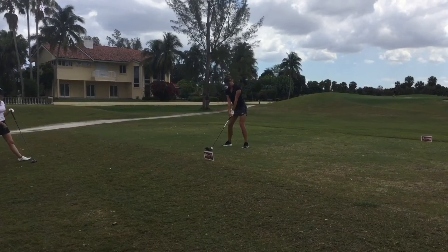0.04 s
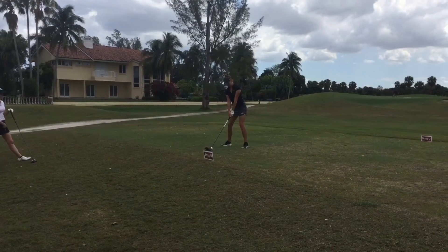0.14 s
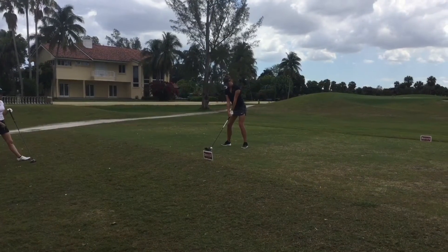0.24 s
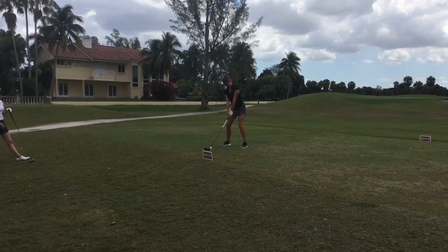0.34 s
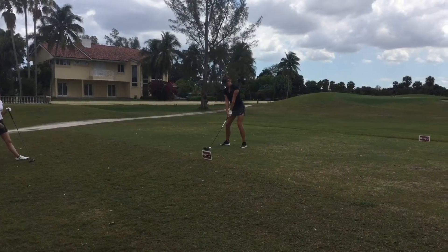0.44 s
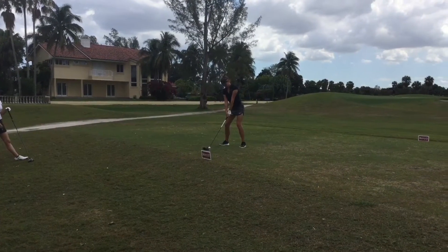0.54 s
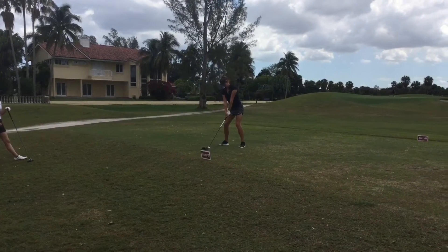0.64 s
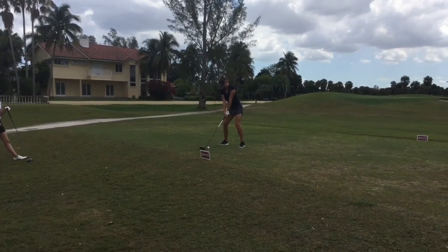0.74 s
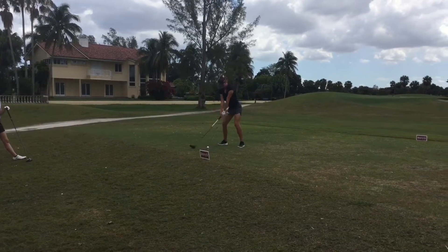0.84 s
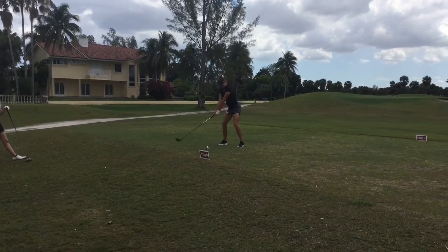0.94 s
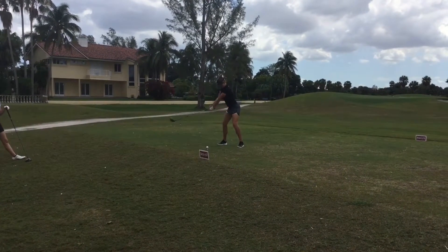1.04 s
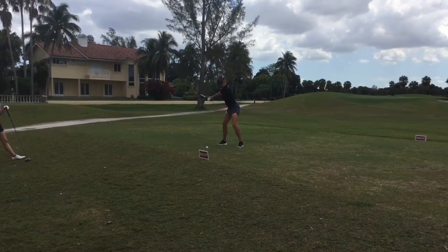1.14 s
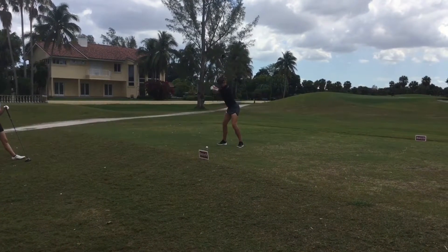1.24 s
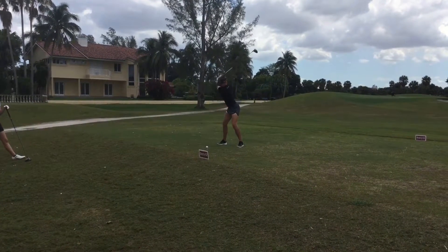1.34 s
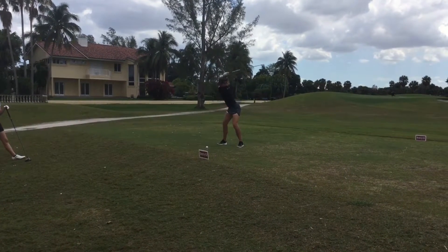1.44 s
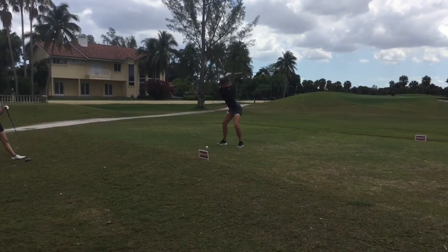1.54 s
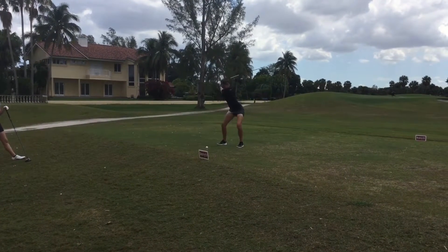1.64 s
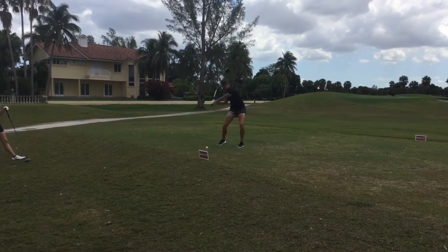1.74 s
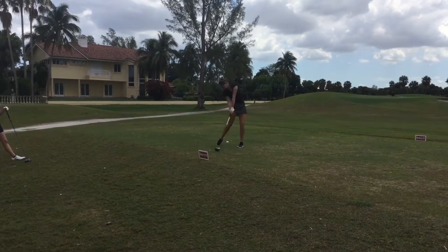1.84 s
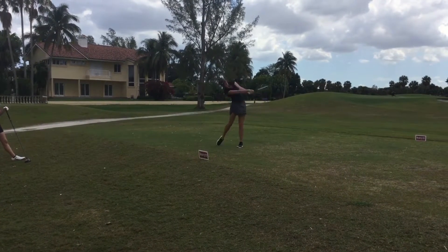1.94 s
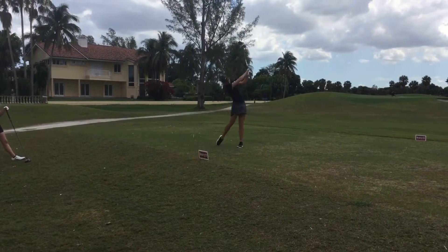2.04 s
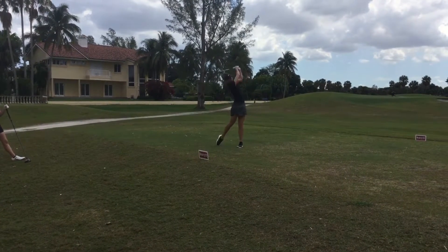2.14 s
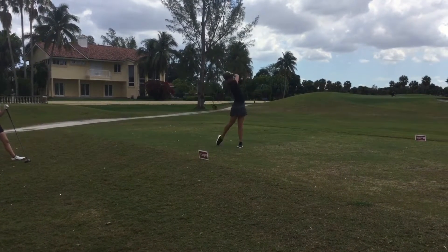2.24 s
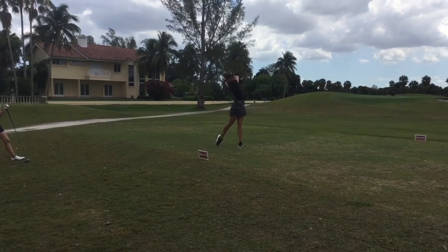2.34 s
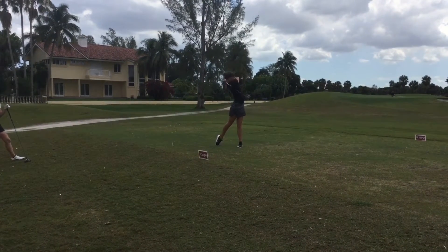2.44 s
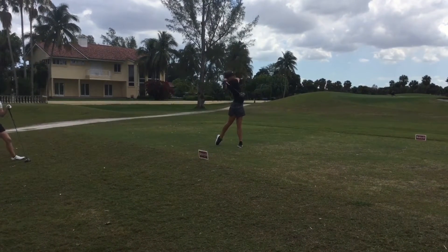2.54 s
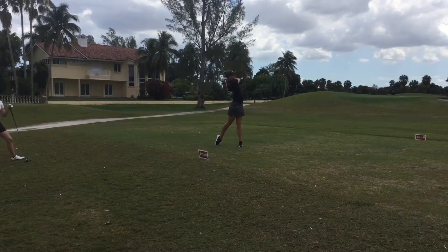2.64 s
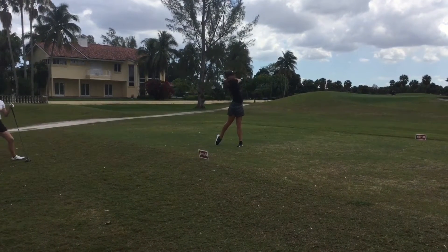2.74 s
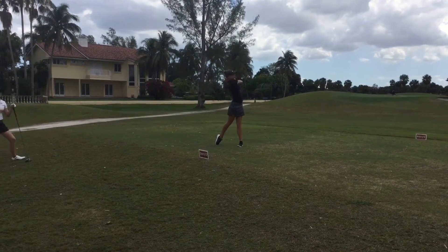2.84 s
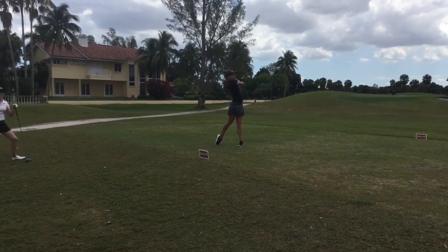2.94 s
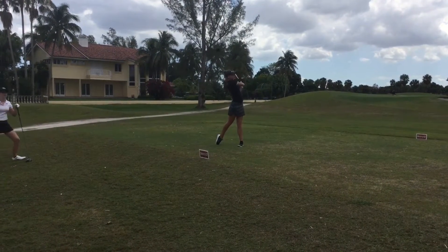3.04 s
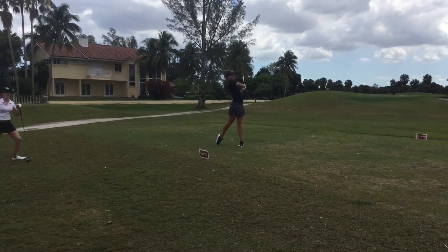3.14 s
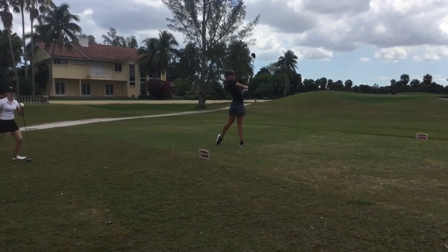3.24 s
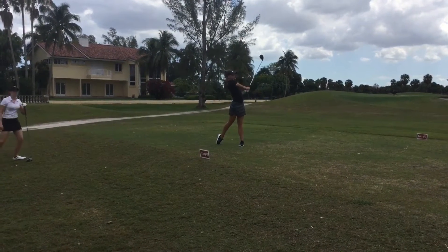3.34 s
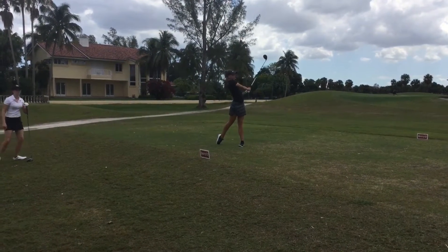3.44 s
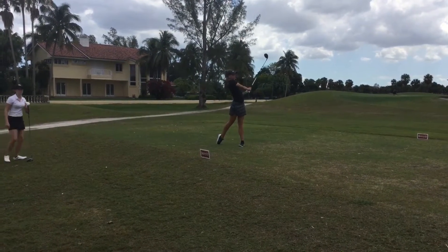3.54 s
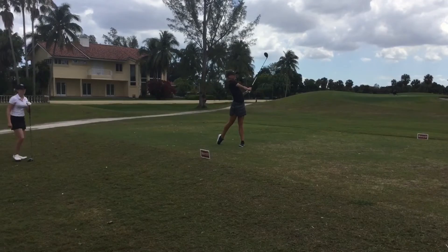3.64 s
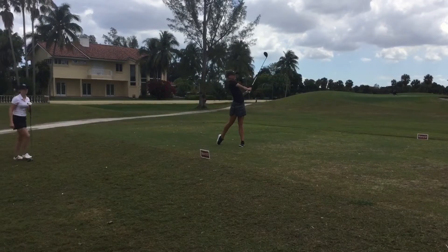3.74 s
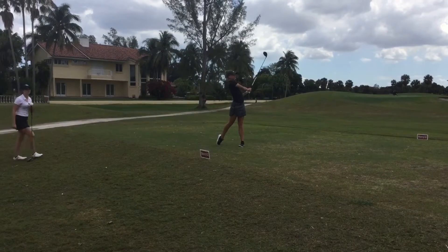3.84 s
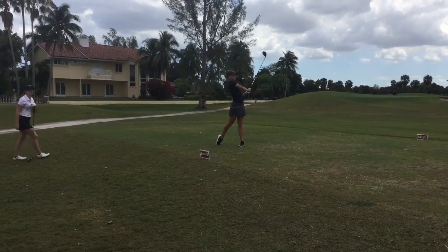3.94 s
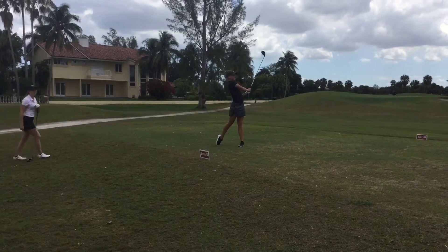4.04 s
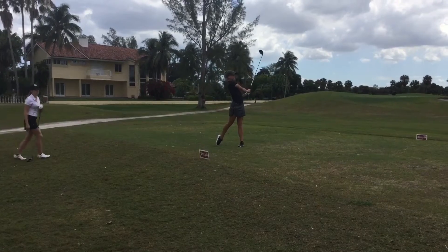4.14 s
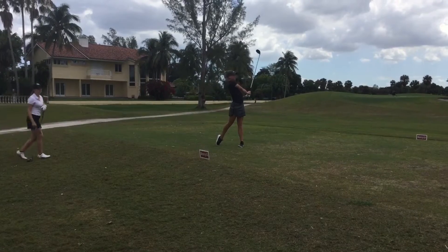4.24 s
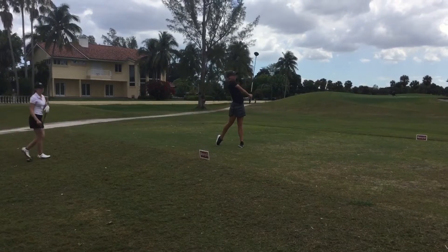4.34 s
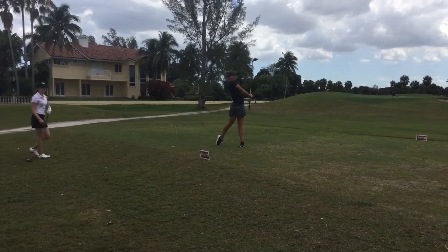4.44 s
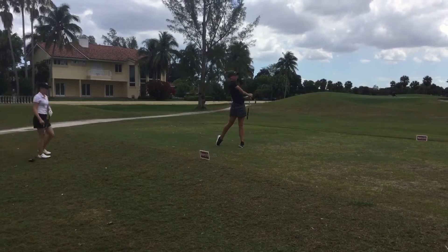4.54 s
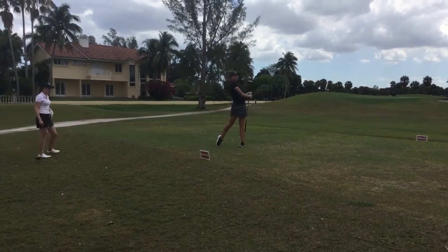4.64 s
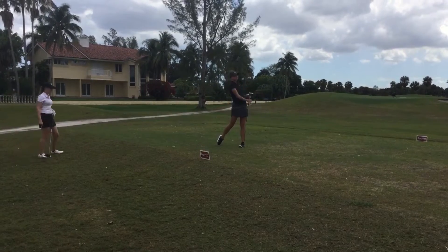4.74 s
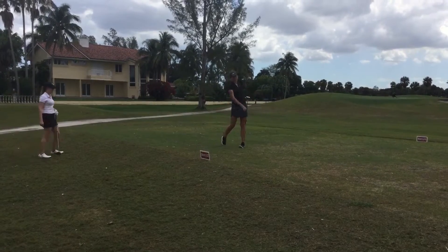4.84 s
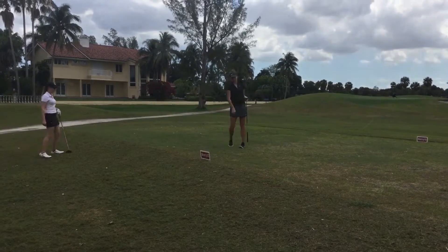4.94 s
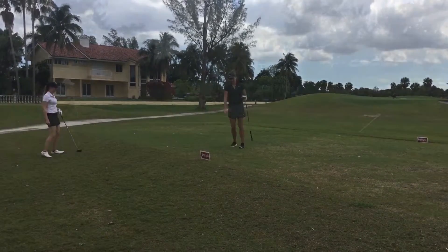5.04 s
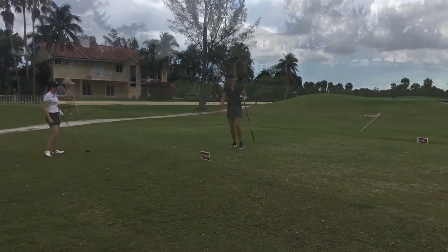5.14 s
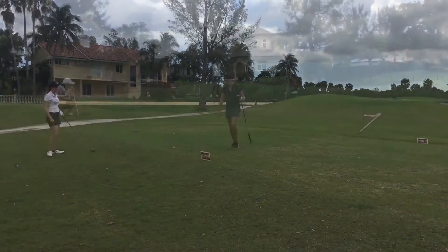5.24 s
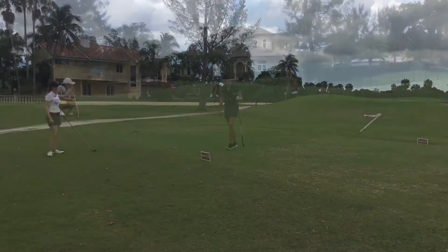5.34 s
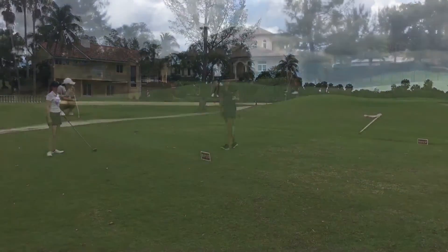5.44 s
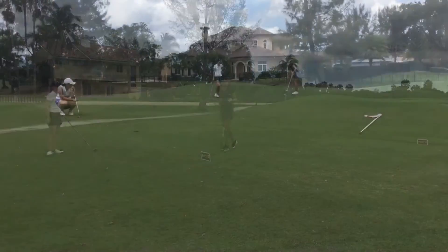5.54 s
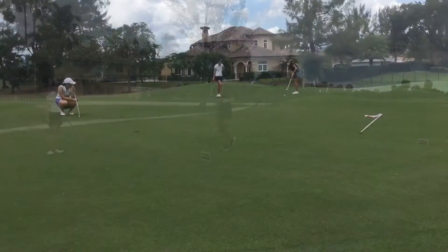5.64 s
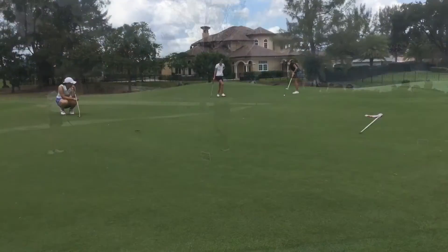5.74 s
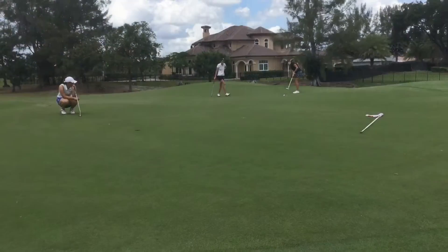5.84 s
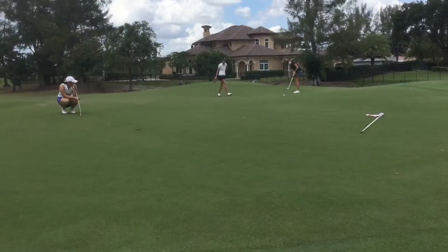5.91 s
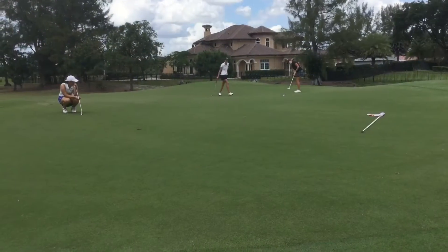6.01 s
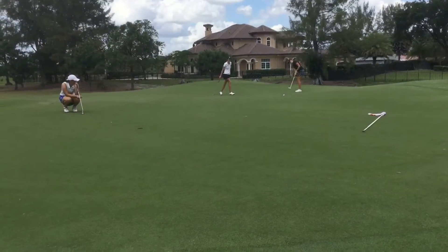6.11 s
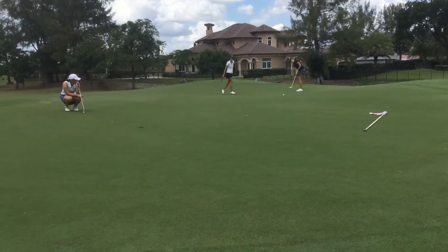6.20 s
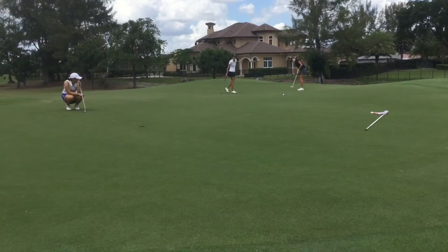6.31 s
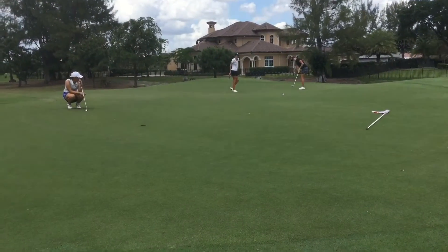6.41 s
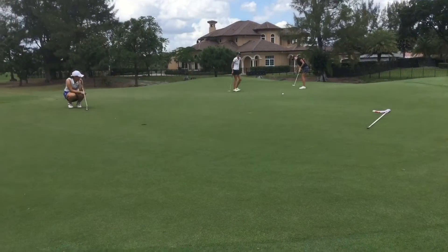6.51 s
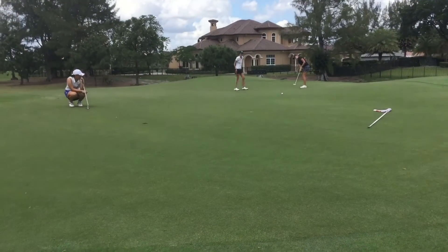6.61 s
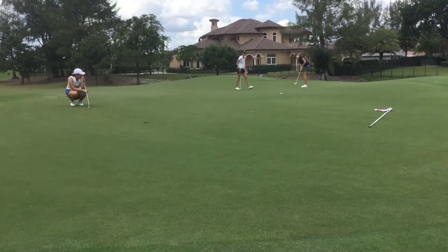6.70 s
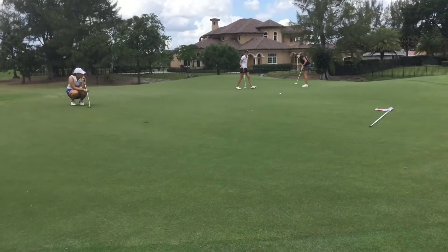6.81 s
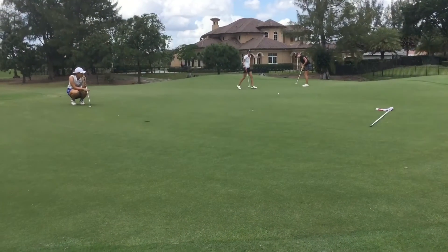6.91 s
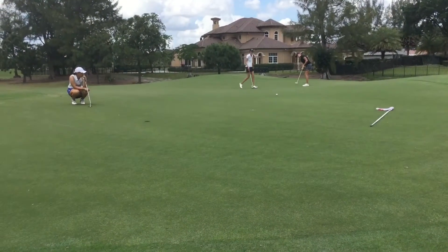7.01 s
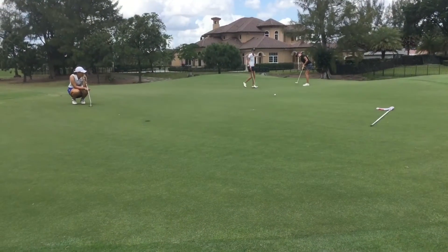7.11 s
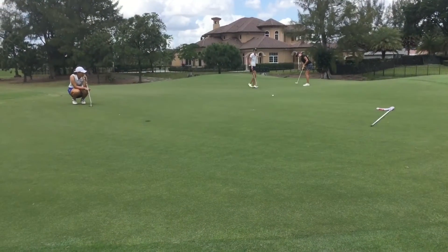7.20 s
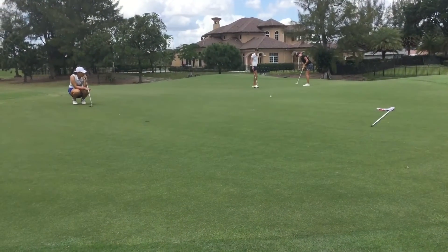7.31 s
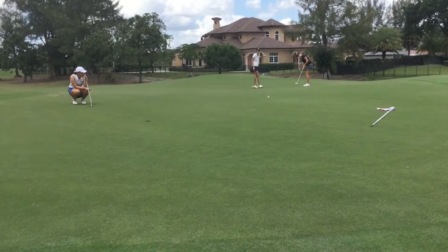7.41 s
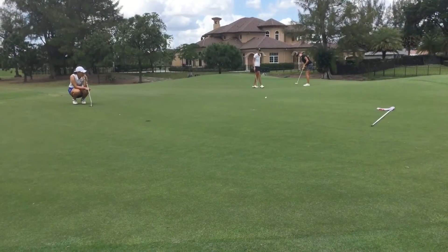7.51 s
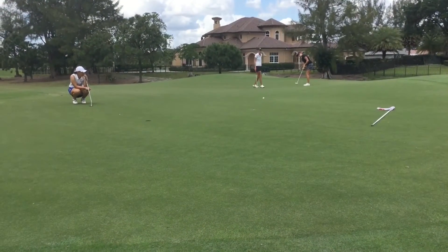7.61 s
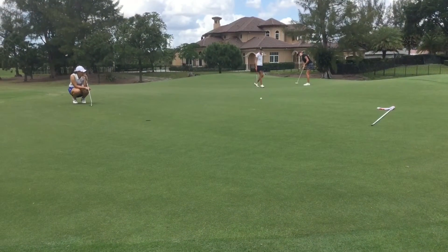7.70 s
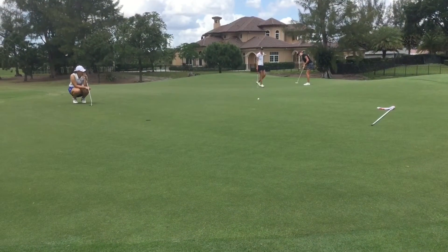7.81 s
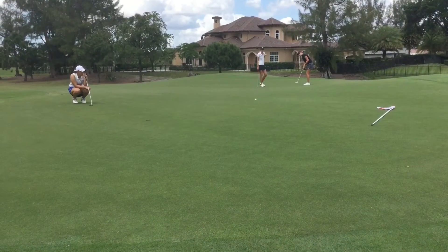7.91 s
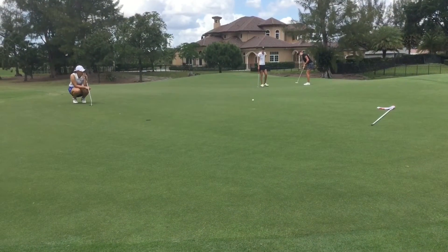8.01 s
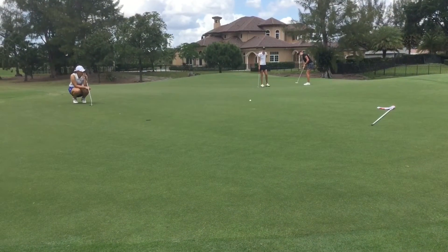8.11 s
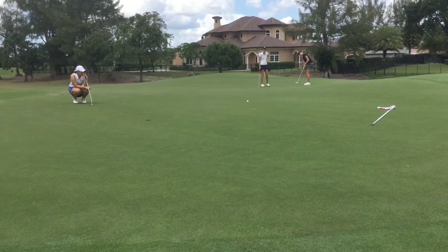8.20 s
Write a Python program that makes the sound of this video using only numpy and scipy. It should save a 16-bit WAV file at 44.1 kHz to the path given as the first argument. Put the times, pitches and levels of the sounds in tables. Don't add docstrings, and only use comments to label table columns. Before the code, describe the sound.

One very sharp golf drive stands far above a quiet open-air background of bass wind rumble and distant traffic wash. A fast whoosh leads into the snap, with a hollow ringing clubhead and a half-second of scattered reflections. Soft knocks, cloth rustles, a gritty glove slide and barely audible birds follow. Midway the ambience crossfades smoothly to a fuller one; no loud putt is heard.

```python
import sys
import numpy as np
from scipy import signal
from scipy.fft import rfft, irfft
from scipy.io import wavfile

SR = 44100
rng = np.random.default_rng(int(sys.argv[2]) if len(sys.argv) > 2 else 0)


def gain_from_decibels(decibels):
    exponent = np.asarray(decibels, float) / 20
    return 10 ** exponent


def materialize(psi):
    bounded = np.clip(np.atleast_2d(psi).T, -1, 1)
    quanta = np.round(bounded * 32767).astype(np.int16)
    wavfile.write(sys.argv[1], SR, quanta)


N = 364266

# t/s, rumble level/dB
GUSTS = [(0.0, -48.5), (0.09, -43.5), (1.93, -41.5), (1.98, -50), (2.09, -44.5), (2.78, -45), (3.63, -41),
         (3.86, -48.5), (3.91, -40.5), (5.36, -46.5), (6.56, -39.5), (6.6, -52), (6.67, -39), (6.81, -43),
         (7.45, -43), (7.55, -45.5), (8.24, -40), (8.26, -48.5)]
# t/s, share of the green/0-1
GREEN_SHARE = [
    (0, 0),
    (5.15, 0.04),
    (5.8, 0.73),
    (8.26, 0.98),
]
# f/Hz, density/dB per Hz
TEE_RUMBLE = [(13, -66), (22, -36), (27, -27), (45, -8), (60, -1), (76, 1), (115, -1), (156, -6.5),
              (179, -16), (232, -21), (330, -35.5), (430, -63), (730, -120)]
# f/Hz, density/dB per Hz
GREEN_RUMBLE = [(13, -65), (22, -35), (27, -31.5), (29, -21), (34, -14), (44, -8.5), (70, 2), (107, -5.5),
                (143, -5), (257, -22), (330, -23.5), (430, -51.5), (730, -120)]
# f/Hz, density/dB per Hz
TEE_AIR = [(120, -25.5), (200, -3), (334, -14.5), (387, -24.5), (529, -19), (659, -22.5), (1100, -24),
           (2050, -34.5), (2250, -34), (2470, -37.5), (7680, -49.5), (14300, -50), (16000, -60)]
# f/Hz, density/dB per Hz
GREEN_AIR = [(120, -31.5), (200, 1), (259, -10), (373, -10), (401, -11), (432, -8.5), (465, -15.5),
             (763, -17.5), (1770, -30.5), (2910, -36.5), (4120, -42), (13800, -57), (16000, -71)]
# t/s, peak level/dB
HUM_SWELLS = [(.02, -71), (.32, -66.5), (.96, -69.5), (1.26, -76), (1.5, -81), (1.69, -82), (2.216, -69),
              (2.39, -76.5), (2.68, -82), (2.96, -77.5), (3.14, -80), (3.28, -79.5), (3.4, -79)]
# t/s, peak level/dB, body f/Hz, brightness/dB, t60/s
KNOCKS = [(0.799, -60, 1160, -10.5, 0.03), (1.269, -58, 1210, -24, 0.03), (2.855, -60, 1060, -22.5, 0.03),
          (2.926, -55, 1297, -22.5, 0.03), (2.97, -56.5, 1130, -23, 0.03), (3.209, -45, 1330, -33, 0.019),
          (4.048, -51.5, 1200, -20, 0.017), (4.797, -51, 1030, -10, 0.051), (5.405, -47, 1040, -30, 0.0086),
          (6.948, -52.5, 1480, -26, 0.035), (7.412, -52.5, 1620, -29.5, 0.028)]
# t/s, length/s, f/Hz, level/dB
RUSTLES = [(.72, .05, 4500, -80), (.72, .05, 2300, -78), (2.9, .08, 1800, -74), (3.207, .008, 4750, -77),
           (3.215, .06, 1500, -71), (3.51, .05, 13000, -82), (4.35, .055, 2800, -69),
           (4.796, .014, 2400, -67), (4.8, .018, 5900, -67), (4.795, .016, 13500, -70),
           (5.29, .025, 12000, -82), (5.332, .01, 4700, -78), (5.332, .008, 3400, -79),
           (5.403, .006, 2700, -70), (5.404, .005, 4600, -75), (5.403, .008, 700, -62)]
# t/s, length/s, start f/Hz, end f/Hz, level/dB
WHISTLES = [(1.165, 0.15, 3450, 3140, -88), (1.31, .09, 3250, 3130, -84.5), (1.393, 0.017, 2700, 2500, -81),
            (1.48, 0.018, 2940, 2750, -66.5), (1.488, 0.015, 8450, 7500, -82),
            (1.491, 0.041, 2420, 1990, -70.5), (1.493, 0.023, 5100, 4230, -73),
            (1.506, 0.026, 4190, 4120, -75), (1.489, .022, 2576, 2290, -65),
            (5.502, 0.029, 2430, 2530, -86.5), (5.591, 0.017, 3750, 3400, -85.5),
            (5.765, .03, 3870, 3520, -82), (5.819, 0.03, 4000, 3660, -81.5), (5.86, .03, 3970, 4050, -85),
            (5.97, 0.046, 4150, 3700, -78.5), (7.164, 0.028, 3060, 3120, -80),
            (7.226, 0.029, 3054, 2790, -74), (7.93, .015, 5100, 5000, -84), (7.969, 0.036, 3050, 2700, -75)]
# low f/Hz, high f/Hz, level at full speed/dB, power of speed, gain reached over the last 15 ms/dB
SWING_BANDS = [
    (450, 1050, -47.5, 1.2, 1.5),
    (280, 2000, -52, 4.0, 12.5),
    (3400, 7600, -52, 4.6, 15.0),
    (8000, 15300, -63, 3.5, -3.0),
]
# lead before the ball/s, level/dB
LEAD_IN = (0.0023, -30.5)
# f/Hz, level from the ball/dB, level from the tee/dB, t60/s
HEAD_MODES = [(3250, -48, -39, .12), (3800, -22, -44, .012), (4220, -29, -37, .07), (4335, -35, -38, .1),
              (5010, -22, -44, .015), (6300, -30, -26, .035), (6525, -31, -30, .055), (6790, -31, -29, .06),
              (7165, -22, -31, .025), (8170, -36, -33, .03), (8890, -34, -38, .07), (10930, -31, -36, .05),
              (12660, -24, -31, .014), (14740, -32, -31, .015)]
# f/Hz, density/dB per Hz
TURF = [(120, -32.5), (200, -1), (2650, -16), (3190, -7), (3560, -18), (4270, -5), (4770, -19), (6400, -10),
        (14900, -17), (16000, -26.5)]
# t/s, dull level/dB, bright over dull/dB, fall/dB per s
WASH = [
    (1.939, -24, -2, 850),
    (1.964, -37, 1, 560),
    (2.004, -55.5, -6.5, 110),
]
# f/Hz, density/dB per Hz
RETURN_COLOUR = [(350, -27), (600, 0.5), (634, -10), (1140, -2.5), (1800, -10.5), (1960, -8.5), (3210, -17),
                 (4220, -7), (4840, -18), (6200, -5), (6830, -12), (13600, -28), (15400, -30.5),
                 (16000, -46)]
# t/s, depth/s, thump level/dB, ring over thump/dB
STANDS = [
    (2.08, 0.11, -57.5, -4),
    (2.205, 0.0079, -63.5, -5),
    (2.257, 0.12, -66, -2.5),
    (2.41, 0.07, -75.5, 1),
    (2.58, .05, -77, -11),
]
STAND_FALLS = 800, 164, 600
# t/s, peak level/dB, ring f/Hz, crack/dB, thump/dB
WALLS = [
    (2.056, -48, 4200, -15, -7),
    (2.0778, -46, 4350, -16, 2.5),
    (2.0994, -43, 4300, -14, -2),
    (2.253, -61, 4100, 8.5, -7),
    (2.307, -67, 4300, -8, 10),
    (2.39, -45, 4050, -10, -13),
    (2.455, -63, 4300, -15, -15),
]
# t/s, hold/s, level/dB, sag/dB per s, release/dB per s
SLIDE = [
    (4.298, 0.12, -62.5, 6, 600.5),
    (4.298, .127, -72.5, -55, 1000),
]
# f/Hz, width/Hz, level/dB
TUBE_MODES = [
    (1970, 200, 2),
    (2800, 250, -6),
    (3500, 300, -9),
    (4400, 400, -12),
    (5900, 300, -15),
]
# f/Hz, density/dB per Hz
GLOVE = [(2940, -35), (5000, -10.5), (5990, -4), (6350, -1.5), (14500, 3), (15500, -2), (16000, -26)]

STRIKE_S = 1.93518


def rms_one(x):
    return x / np.sqrt(np.mean(x ** 2) + 1e-20)


def in_time(rows):
    s, *columns = np.transpose(rows)
    return [np.interp(np.arange(N) / SR, s, c) for c in columns]


def coloured(spectrum, count=N):
    hz, db = np.transpose(spectrum)
    grid = np.fft.rfftfreq(count, 1 / SR) + 1
    gain = gain_from_decibels(np.interp(np.log(grid), np.log(hz), db, -120, -120))
    return rms_one(irfft(rfft(rng.standard_normal(count)) * gain, count))


def band(x, low_hz, high_hz):
    return signal.sosfilt(signal.butter(2, [low_hz, high_hz], "band", fs=SR, output="sos"), x)


def steep(x, low_hz, high_hz):
    return signal.sosfilt(signal.butter(5, [low_hz, high_hz], "band", fs=SR, output="sos"), x)


def drift(rate):
    r = np.exp(-80 * np.pi * rate / SR)
    slow = signal.lfilter([1], [1, -2 * r, r * r], rng.standard_normal(N // 40 + 2002))
    slow = slow[2000:]
    return np.interp(np.arange(N) / 40, np.arange(len(slow)), rms_one(slow))


def patchy(x, patchy_db, rate=9.0):
    edges = 100 * 2.0 ** np.arange(8)
    lows = [signal.sosfiltfilt(signal.butter(2, hz, fs=SR, output="sos"), x) for hz in edges[1:]]
    octaves = np.diff([0 * x, *lows, x], axis=0)
    return sum(gain_from_decibels(patchy_db * drift(rate)) * octave for octave in octaves)


def ring(clicks, hz, t60):
    r, w = gain_from_decibels(-60 / (t60 * SR)), 2 * np.pi * hz / SR
    return signal.lfilter([0, np.sin(w)], [1, -2 * r * np.cos(w), r * r], clicks + 1e-18)


def swell(s, peak_db, rise, fall, hold=0, sag=0):
    t = np.arange(N) / SR - s
    return peak_db + rise * np.minimum(t, 0) - sag * np.clip(t, 0, hold) - fall * np.maximum(t - hold, 0)


def loudest(swells):
    return np.max(swells, axis=0)


def add(out, x, s):
    i = round(s * SR)
    out[i:i + len(x)] += x[:N - i]


def air():
    tee_db, green_db, green_swell_db_per_s = -70.5, -63.5, 0.9
    wind_db, = in_time(GUSTS)
    green = np.clip(in_time(GREEN_SHARE)[0], 0, 1)
    tee_gain, green_gain = np.sqrt(1 - green), np.sqrt(green)
    lumps = tee_gain * coloured(TEE_RUMBLE) + green_gain * coloured(GREEN_RUMBLE)
    tee, putting = coloured(TEE_AIR), coloured(GREEN_AIR)
    tee = tee / np.std(steep(tee, 350, 1200))
    putting = putting / np.std(steep(putting, 350, 1200))
    green_db = green_db + green_swell_db_per_s * (np.arange(N) / SR - GREEN_SHARE[2][0])
    wash = gain_from_decibels(tee_db) * tee_gain * tee + gain_from_decibels(green_db) * green_gain * putting
    wind = gain_from_decibels(wind_db + 0.49 * drift(5.8) + 0.91 * drift(5.5)) * lumps
    return wind + patchy(wash, patchy_db=1.6)


def hum():
    level_db = loudest([swell(s, db, rise=110, fall=90) for s, db in HUM_SWELLS])
    hz = 586 + 5.0 * drift(6.8)
    return gain_from_decibels(level_db + 4.0) * np.sin(2 * np.pi * np.cumsum(hz) / SR)


def rustles():
    out, t = np.zeros(N), np.arange(round(.08 * SR)) / SR
    for s, length, hz, level_db in RUSTLES:
        soft = np.sin(np.pi * np.clip(t / length, 0, 1))
        puff = rms_one(band(rng.standard_normal(len(t)), .92 * hz, 1.09 * hz))
        add(out, gain_from_decibels(level_db) * soft * puff, s)
    return out


def knocks():
    click_db, below_oct, above_oct = 19.5, .4, 0.74
    out, t = np.zeros(N), np.arange(round(.08 * SR)) / SR
    puffs = rng.standard_normal((len(KNOCKS), 2, len(t)))
    for (s, peak_db, hz, bright_db, t60), (dull, bright) in zip(KNOCKS, puffs):
        fall = gain_from_decibels(-60 * t / t60) * np.minimum(t / .0015, 1)
        contact = dull * fall + gain_from_decibels(click_db) * (t == t[30])
        body = steep(contact, hz * 2 ** -below_oct, hz * 2 ** above_oct)
        scrape = band(bright * fall, 3000, 13000)
        body = body / np.max(np.abs(body))
        scrape = scrape / np.max(np.abs(scrape))
        add(out, gain_from_decibels(peak_db - 1.0) * (body + gain_from_decibels(bright_db + 4.5) * scrape), s)
    return out


def birds():
    octave_db = -29
    out, hoarse = np.zeros(N), gain_from_decibels(4.0 * drift(250.0))
    for s, length, start_hz, end_hz, level_db in WHISTLES:
        u = np.linspace(0, 1, round(length * SR))
        hz = start_hz + (end_hz - start_hz) * u ** 0.83
        turn = 2 * np.pi * np.cumsum(hz) / SR
        tone = np.sin(turn) + gain_from_decibels(octave_db) * np.sin(2 * turn)
        add(out, gain_from_decibels(level_db + 3.5) * np.sin(np.pi * u) * tone, s)
    t = np.arange(round(.15 * SR)) / SR
    echoes = rng.standard_normal(len(t)) * np.exp(-t / 0.046)
    return hoarse * out + gain_from_decibels(-33.0) * signal.fftconvolve(out, echoes)[:N]


def swing():
    downswing_s, final_s = .08, 0.015
    ahead = STRIKE_S - np.arange(N) / SR
    speed = np.clip(1 - ahead / downswing_s, 0, 1)
    final = np.clip(1 - ahead / final_s, 0, 1)
    out = np.zeros(N)
    for low_hz, high_hz, top_db, power, final_db in SWING_BANDS:
        level = speed ** power * gain_from_decibels(top_db + final_db * final + 1100 * np.minimum(ahead, 0))
        out += level * rms_one(steep(rng.standard_normal(N), low_hz, high_hz))
    lead_s, lead_in_db = LEAD_IN
    lead_in = rms_one(steep(rng.standard_normal(SR // 10), 5100, 7600))[-round(lead_s * SR):]
    add(out, gain_from_decibels(lead_in_db) * lead_in, STRIKE_S - lead_s)
    return out


def blow():
    tee_knock_s = .0058
    t = np.arange(round(.2 * SR)) / SR
    click = 1.0 * (t == 0)
    late = np.maximum(t - .00009, 0)
    hz = 350 + 1850 * np.exp(-late / .0007)
    shape = (1 - np.exp(-late / .00019)) ** 2 * np.exp(-late / .001)
    thump = gain_from_decibels(4.6) * shape * np.sin(2 * np.pi * np.cumsum(hz * (late > 0)) / SR)
    crack = -gain_from_decibels(4.5) * band(click, 4300, 15000)
    hiss = band(rng.standard_normal(len(t)), 2700, 15800)
    snap = gain_from_decibels(-14.0) * np.exp(-t / .0005) + gain_from_decibels(-18.0) * np.exp(-t / .002)
    tee_snap = gain_from_decibels(-22.0) * np.exp(-np.maximum(t - tee_knock_s, 0) / 0.0023) * (t > tee_knock_s)
    head = 0
    for mode_hz, ball_db, tee_db, t60 in HEAD_MODES:
        clicks = np.zeros(len(t))
        clicks[[0, round(tee_knock_s * SR)]] = gain_from_decibels(ball_db), gain_from_decibels(tee_db)
        head = head + ring(clicks, mode_hz, t60)
    thud = gain_from_decibels(-17.5) * ring(click, 345, 0.019)
    shell = gain_from_decibels(-14.0) * ring(1.0 * (t == t[7]), 1790, .012)
    direct = crack + thump + thud + shell + (snap + tee_snap) * hiss - head
    return signal.lfilter(*signal.iirnotch(2800, 2.2, fs=SR), direct)


def strike():
    rise, extra_fall = 1300, 120
    turf = gain_from_decibels(1.4 * drift(120.0)) * coloured(TURF) * (np.arange(N) > STRIKE_S * SR)
    dull_db = loudest([swell(s, db, rise, fall) for s, db, _, fall in WASH])
    bright_db = loudest([swell(s, db + over_db, rise, fall + extra_fall) for s, db, over_db, fall in WASH])
    out = gain_from_decibels(dull_db) * steep(turf, 200, 2550) + gain_from_decibels(bright_db) * steep(turf, 2850, 15800)
    out *= gain_from_decibels(2.5)
    add(out, blow(), STRIKE_S)
    return out


def trees():
    rise, sag = 600.5, 37.5
    crack_db, crack_loss_db_per_s = 5.0, 59
    smear = patchy(coloured(RETURN_COLOUR), 3.5, 40.0)
    thump_fall, ring_fall, crack_fall = STAND_FALLS
    thump_db = loudest([swell(s, db, rise, thump_fall, depth, sag) for s, depth, db, _ in STANDS])
    ring_db = loudest([swell(s, db + over_db, rise, ring_fall, depth, sag) for s, depth, db, over_db in STANDS])
    top_db = loudest([swell(s, db, rise, crack_fall, depth, sag) for s, depth, db, _ in STANDS])
    top_db = top_db + crack_db - crack_loss_db_per_s * np.abs(np.arange(N) / SR - STRIKE_S)
    out = gain_from_decibels(thump_db) * rms_one(steep(smear, 600, 3000))
    out += gain_from_decibels(ring_db) * rms_one(steep(smear, 3000, 7500))
    out += gain_from_decibels(top_db) * rms_one(steep(smear, 7500, 15500))
    hanging = rms_one(ring(rng.standard_normal(N), 4080, 0.0091))
    return out + gain_from_decibels(ring_db - 6.5 + 5.0 * drift(25.0)) * hanging


def walls():
    out, t = np.zeros(N), np.arange(round(.06 * SR)) / SR
    puffs = rng.standard_normal((len(WALLS), len(t))) * np.exp(-t / 0.0029)
    for (s, peak_db, hz, crack_db, thump_db), puff in zip(WALLS, puffs):
        head = rms_one(ring(puff, hz, 0.015))
        crack = gain_from_decibels(crack_db) * rms_one(band(puff, 5300, 7000))
        thump = gain_from_decibels(thump_db) * rms_one(band(puff, 1000, 3300))
        add(out, gain_from_decibels(peak_db - 3.0) * (head + crack + thump) / np.max(np.abs(head)), s)
    return out


def slide():
    tube_db, rub_db = [swell(s, db, 1400.5, fall, hold, sag) for s, hold, db, sag, fall in SLIDE]
    size = gain_from_decibels(2.8 * np.minimum(rng.exponential(1, N), 3))
    slips = rng.random(N) < 1200 / SR
    grains = size * slips * rng.choice([-1, 1], N)
    rub = gain_from_decibels(3.3 * drift(200.0)) * coloured(GLOVE)
    rub = rub + gain_from_decibels(-8.5) * rms_one(band(grains, 5000, 15500))
    tube = np.zeros(N)
    for hz, width_hz, db in TUBE_MODES:
        mode = ring(grains * rng.uniform(-1.14, 1, N), hz, 3.4 / width_hz)
        tube += gain_from_decibels(db + 2.0 * drift(60.0)) * rms_one(mode)
    tube += gain_from_decibels(-11.0) * rms_one(band(rng.standard_normal(N), 1500, 5500))
    return gain_from_decibels(tube_db) * rms_one(tube) + gain_from_decibels(rub_db) * rms_one(rub)


def scene():
    setting = air() + hum() + rustles() + knocks() + birds()
    shot = swing() + strike() + trees() + walls()
    return (setting + shot + slide())[None]


def roll_off(x):
    return signal.sosfilt(signal.butter(12, 16480, fs=SR, output="sos"), x)


def record(dry):
    low = signal.sosfilt(signal.butter(2, 42, "high", fs=SR, output="sos"), dry)
    rounded = 1.3 * np.tanh(low / 1.3)
    cut = signal.sosfilt(signal.cheby2(12, 70, 16400, fs=SR, output="sos"), rounded)
    cut[:, -200:] *= np.linspace(1, 0, 200)
    return roll_off(cut)


dry = scene()
out = record(dry)
materialize(out)
```